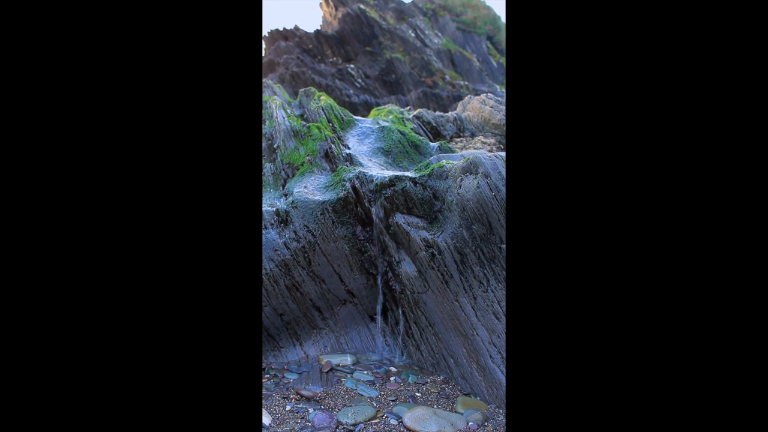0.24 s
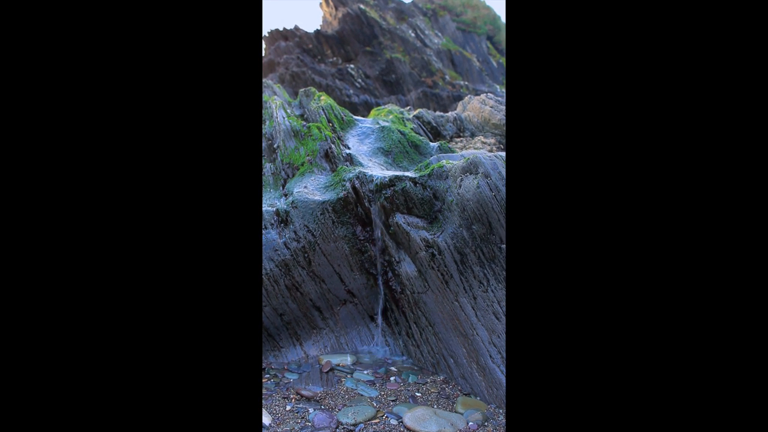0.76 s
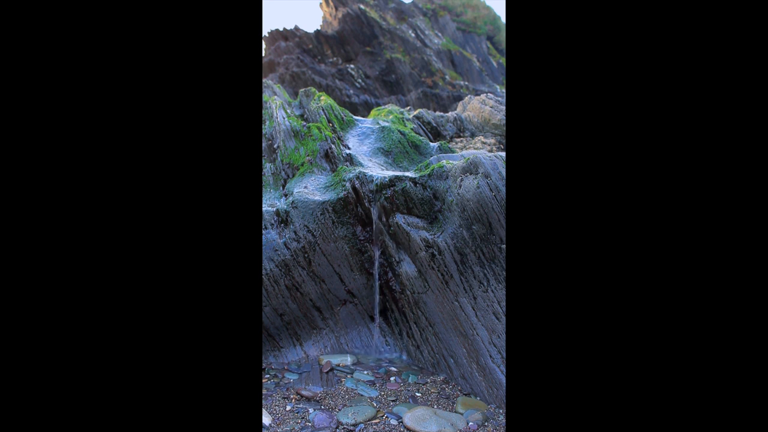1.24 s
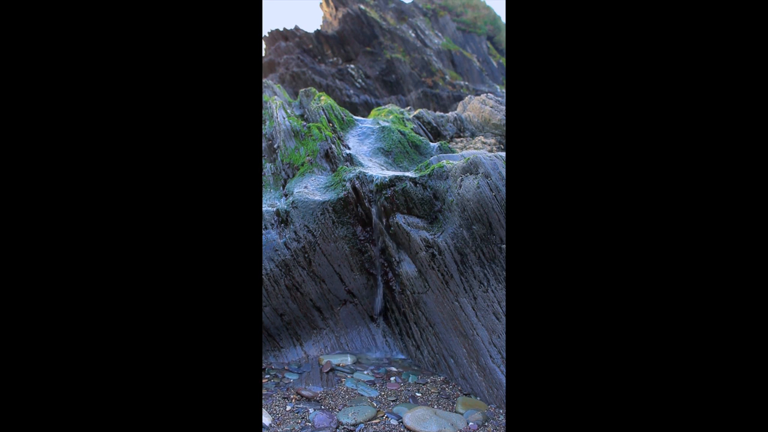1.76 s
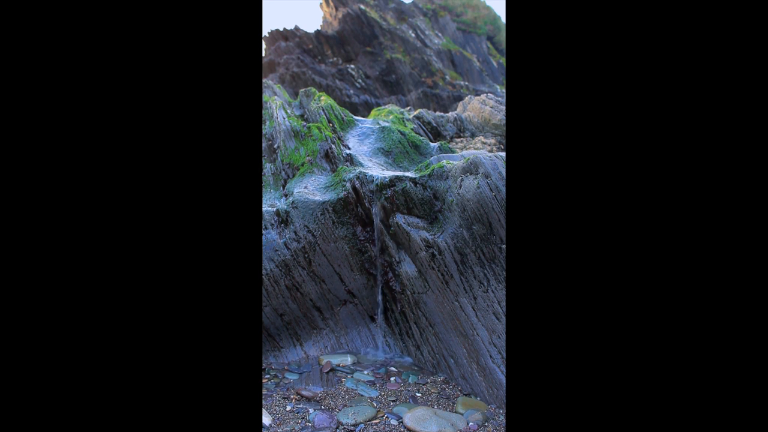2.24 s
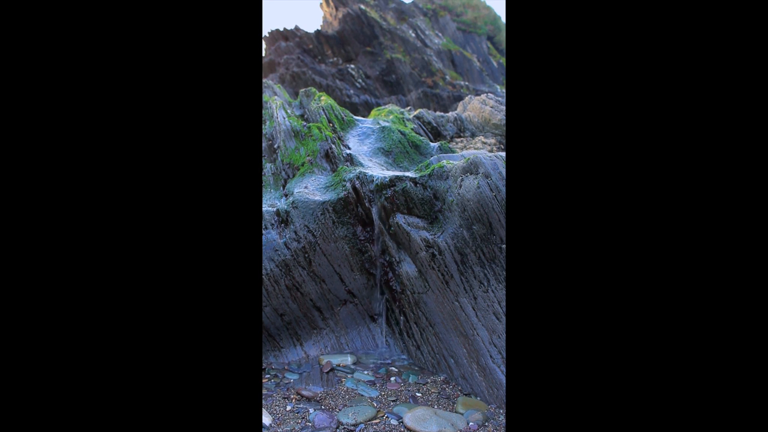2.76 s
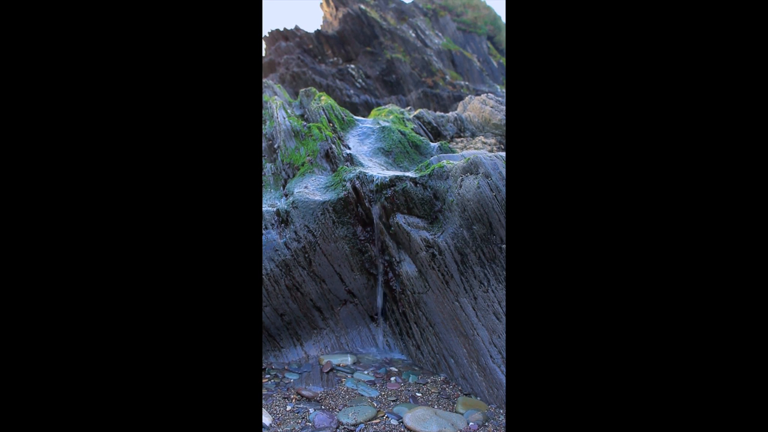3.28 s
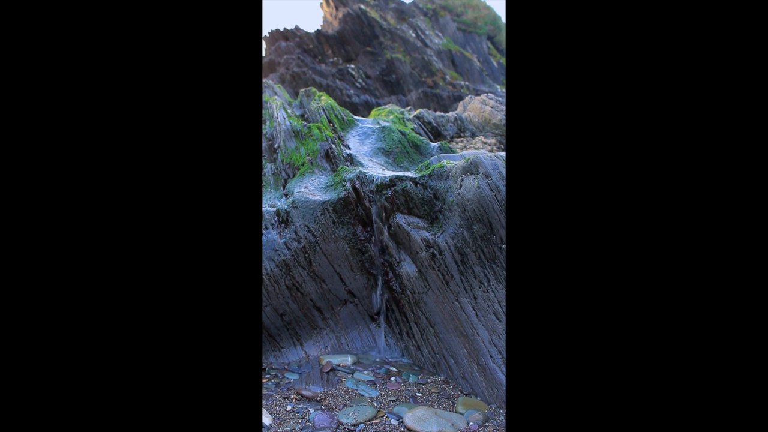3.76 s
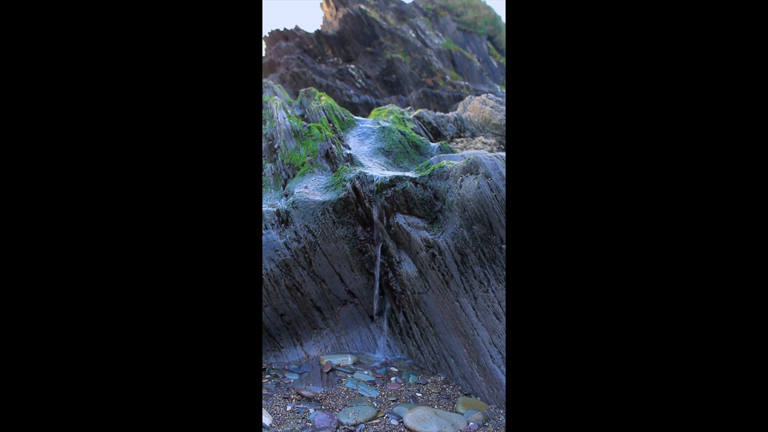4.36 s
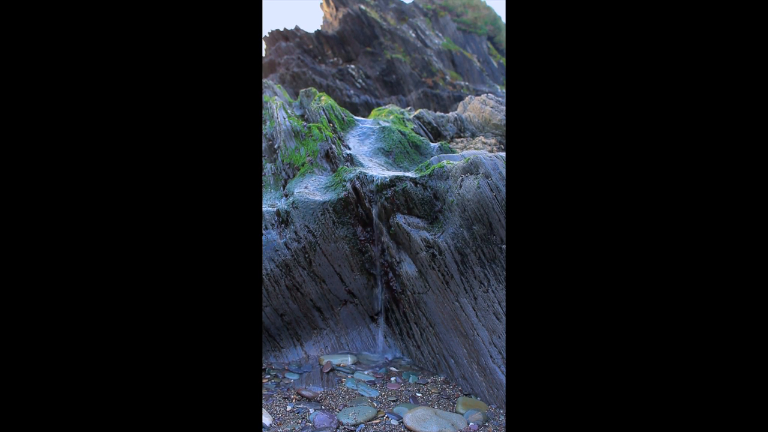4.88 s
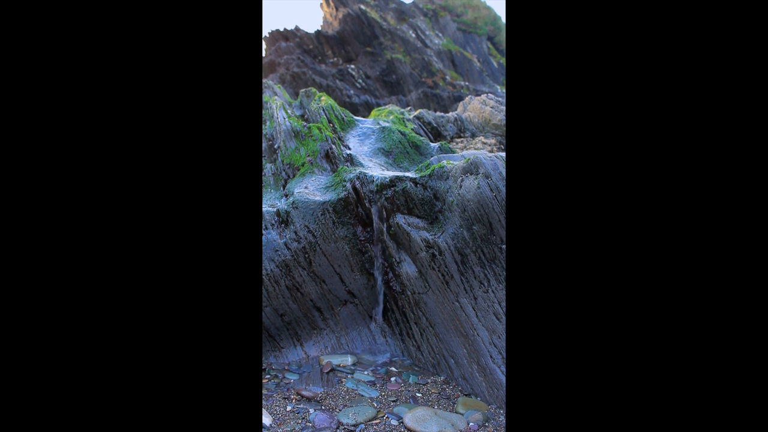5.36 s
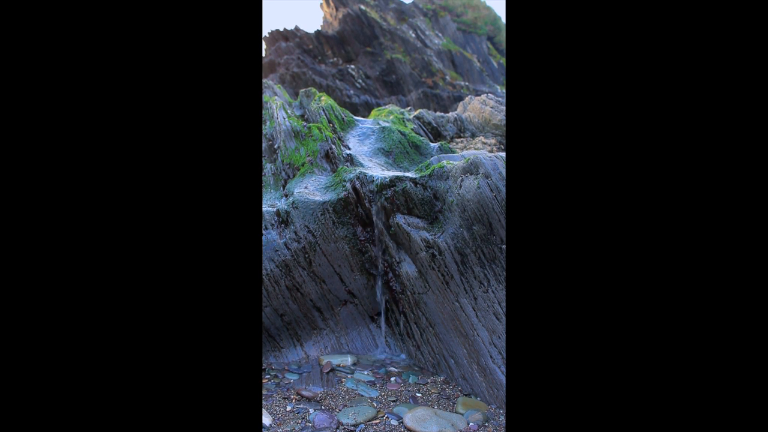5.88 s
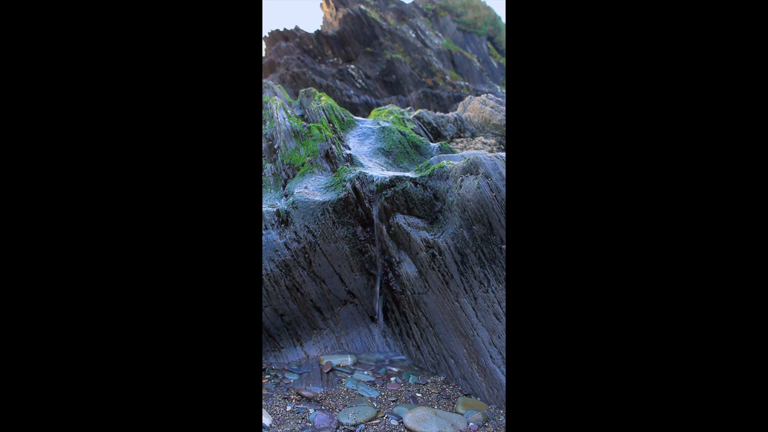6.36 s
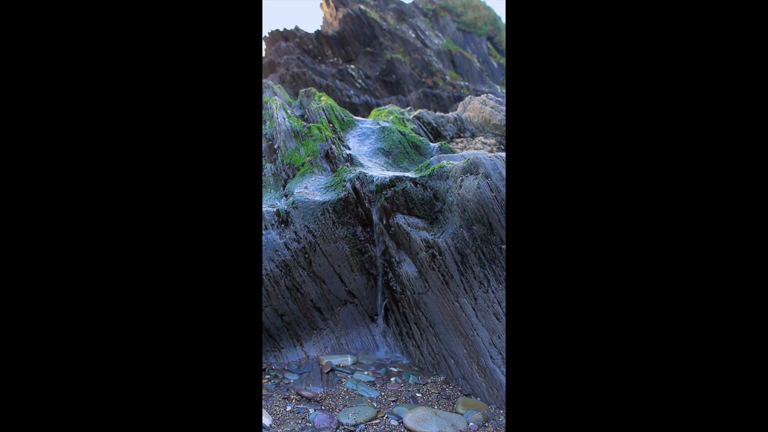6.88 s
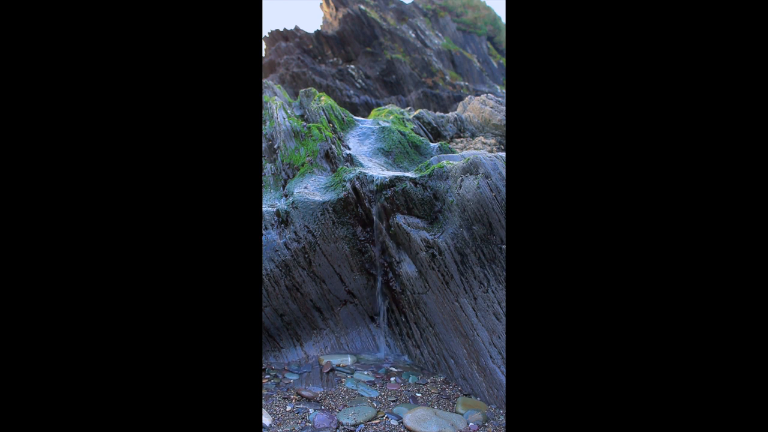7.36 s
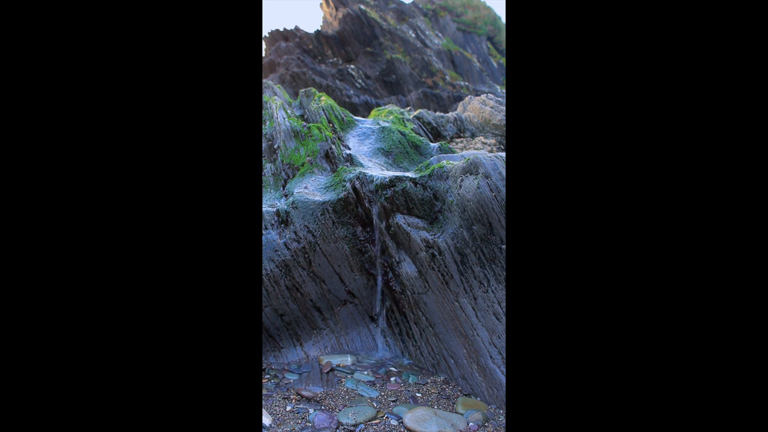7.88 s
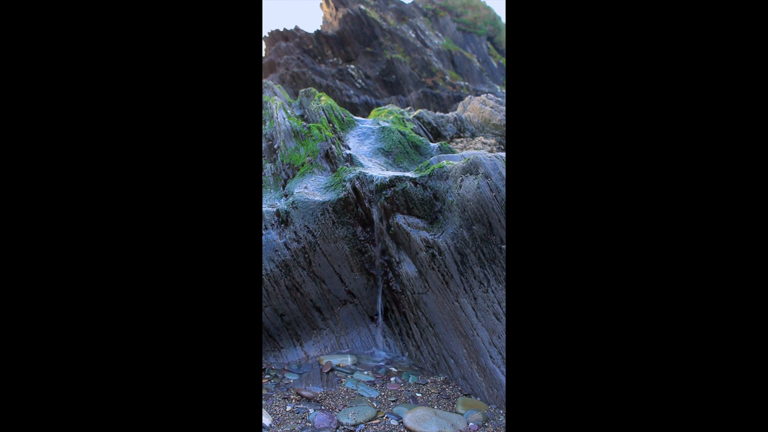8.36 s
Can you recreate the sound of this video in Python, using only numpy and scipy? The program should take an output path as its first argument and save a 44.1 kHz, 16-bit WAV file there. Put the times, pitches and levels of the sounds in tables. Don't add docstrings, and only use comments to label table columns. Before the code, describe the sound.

Close, crisp water drops plink and spit among beach stones with soft far waves behind; late on, pebbles grind and knock briefly.

```python
import sys
import numpy as np
from scipy import signal
from scipy.io import wavfile
from scipy.ndimage import uniform_filter1d, map_coordinates

SR = 44100
rng = np.random.default_rng(int(sys.argv[2]) if len(sys.argv) > 2 else 0)


def generate_wav(signal):
    frames = np.transpose(np.atleast_2d(signal))
    scaled = np.clip(frames, -1, 1) * 32767
    pcm = np.round(scaled).astype(np.int16)
    wavfile.write(sys.argv[1], SR, pcm)


def nominal_scale(level):
    x = np.asarray(level, float) / 20
    return 10 ** x


N = 380583


def evened(x):
    return x / np.sqrt(np.mean(x ** 2) + 1e-20)


def smooth_noise(shape, *sizes):
    drift = rng.standard_normal(shape)
    for axis, size in enumerate(sizes):
        drift = uniform_filter1d(drift, size=size, axis=axis)
    return evened(drift)


def read(points, hz):
    point_hz, value = np.transpose(points)
    return np.interp(np.log(hz + 1), np.log(point_hz + 1), value)


def follow(rows, column):
    columns = np.transpose(rows)
    return np.interp(np.arange(N) / SR, columns[0], columns[column])


def band_rms(x, lo_hz, hi_hz):
    band = signal.butter(4, [lo_hz, hi_hz], "band", fs=SR, output="sos")
    return np.std(signal.sosfilt(band, x))


def add(mix, s, sound):
    part = mix[max(round(s * SR), 0):][:len(sound)]
    part += sound[:len(part)]


def pip(hz, ms, glide):
    u = np.arange(round(ms * SR / 1000)) / (ms * SR / 1000)
    shape = 6.75 * u * (1 - u) ** 2
    cycles = hz * ms / 1000 * (u * (1 - glide / 3) + glide * u ** 2 / 2)
    return shape * np.sin(2 * np.pi * cycles)


def bubbles(rows, ms, glide, early):
    out = np.zeros(N)
    for (s, db, hz), (long, bend) in zip(rows, rng.random((len(rows), 2))):
        length_ms = ms * (0.55 + 0.6 * long)
        add(out, s - early * length_ms / 3000, nominal_scale(db) * pip(hz, length_ms, glide * 2 * bend))
    return out


def scatter(chords_hz, sizes_db, per_s, spread_db, ms, size=N):
    strength = nominal_scale(spread_db * np.minimum(rng.exponential(1, size), 3))
    hits = (rng.random(size) < per_s / SR) * strength
    which = rng.integers(0, len(chords_hz), size)
    out = np.zeros(size)
    for k, chord in enumerate(zip(chords_hz, sizes_db)):
        grain = np.zeros(1500)
        for hz, db in zip(*chord):
            late, long, bend = rng.random(3)
            tone = evened(pip(hz, ms * (0.5 + long), 0.056 * bend))
            add(grain, late * ms / 3000, nominal_scale(db) * tone)
        out += signal.oaconvolve(hits * (which == k), np.trim_zeros(grain, "b"))[:size]
    return evened(out)


def surf():
    # (pitch [Hz], level [dB per Hz])
    surf_colour = [(64, -56), (110, -19), (170, 3), (330, 4), (520, 2), (1000, -4), (2000, -10.5),
                   (6000, -28.5), (10300, -37), (15000, -74)]
    # (time [s], level [dB])
    swell = [(0.0, -30.5), (0.3, -28.5), (0.9, -29.5), (1.22, -25), (1.36, -27.5), (1.46, -33.5),
             (1.66, -25.5), (2.12, -30), (2.52, -28.5), (3.03, -32.5), (3.3, -27), (3.98, -31.5),
             (4.6, -30), (5.9, -32.5), (6.34, -34.5), (6.58, -32.5), (7.88, -37.5), (8.63, -34.5)]
    frames, hz = N // 256 + 5, np.fft.rfftfreq(1024, 1 / SR)
    a, b = rng.standard_normal((2, 513, frames))
    patches_db = 1.1 * smooth_noise((513, frames), 10, 10)
    spectra = (a + 1j * b) * nominal_scale(read(surf_colour, hz)[:, None] + patches_db)
    wash = signal.istft(spectra, nperseg=1024, noverlap=768)[1][:N]
    return wash / band_rms(wash, 100, 920) * nominal_scale(follow(swell, 1) + 2.5)


def spray(fallen):
    # (pitch [Hz], level [dB])
    spray_colour = [(2300, -4.5), (3300, 0), (4300, 4.5), (5400, 1.5), (7000, 4), (8300, 3), (10000, 5),
                    (15800, -9)]
    # (time [s], spray level [dB])
    trickle = [(0.0, -38), (0.86, -37.5), (1.36, -32), (1.46, -42.5), (1.74, -33), (2.52, -32), (2.92, -39),
               (3.6, -33), (4.34, -43), (4.5, -33), (5.16, -31.5), (5.42, -36.5), (5.9, -34.5),
               (6.34, -37.5), (7.46, -26), (7.88, -39.5), (8.12, -31), (8.63, -36)]
    # (time [s], level [dB], length [ms])
    splashes = [(0.264, -33, 50), (0.456, -31.5, 10), (0.662, -43, 10), (1.534, -29.5, 28),
                (1.571, -34, 24), (1.684, -33.5, 48), (1.829, -27, 8.7), (1.964, -29, 7.5),
                (2.026, -21, 7.5), (2.334, -27, 6.8), (2.472, -32, 25), (2.732, -25.5, 12.6),
                (2.763, -28, 18), (2.86, -36.5, 83), (3.921, -29.5, 18), (3.962, -35, 42),
                (4.244, -33.5, 32), (4.649, -34, 35), (5.187, -31, 27), (5.399, -26.5, 5.5),
                (5.54, -32, 26), (5.591, -34, 38), (5.639, -26, 8.2), (5.949, -30, 11), (6.192, -32, 58),
                (6.841, -30, 31), (6.995, -32, 7.4), (7.148, -35, 46), (7.341, -26.5, 7.5),
                (8.472, -28, 7.6)]
    # (time [s], level [dB])
    slaps = [(0.081, -27), (0.6, -32), (0.793, -25), (2.109, -25), (3.585, -24.5), (4.174, -34),
             (4.481, -35), (4.515, -30), (4.708, -33.5), (5.047, -25), (5.67, -34), (6.531, -28.5),
             (6.592, -19.5), (6.674, -25), (6.883, -27), (6.899, -26), (6.927, -27), (7.014, -31),
             (7.218, -28), (7.305, -22), (7.458, -38), (8.008, -39)]
    # (time [s], level [dB])
    spatters = [(0.394, -34), (0.489, -35.5), (1.384, -38.5), (1.627, -49), (1.681, -41), (1.766, -37),
                (1.907, -35), (1.964, -34), (2.219, -33), (2.286, -33), (2.352, -38), (2.428, -49),
                (2.899, -45), (2.933, -42), (3.148, -34.5), (3.325, -41), (3.429, -36), (3.688, -41),
                (3.723, -32.5), (4.03, -34), (4.132, -35), (4.169, -41), (4.218, -36), (4.485, -32.5),
                (4.976, -36), (5.104, -30.5), (5.149, -38), (5.268, -34), (5.346, -38), (5.794, -35.5),
                (5.86, -31.5), (6.32, -39), (6.489, -36), (7.62, -49), (8.009, -35), (8.198, -31.5),
                (8.244, -49), (8.398, -41)]
    slap_ms, spatter_ms = 7.8, 23.6

    hz = np.geomspace(2300, 15800, num=120)
    chords = rng.permuted(hz.reshape(6, -1), axis=1).T
    mist = scatter(chords, read(spray_colour, chords), per_s=300, spread_db=2.8, ms=3.3)
    thinned = chords[::2]
    hiss = scatter(thinned, read(spray_colour, thinned), per_s=5400, spread_db=-3.5, ms=1.4)
    lone = hz[18:96:2, None]
    plinks = scatter(lone, read(spray_colour, lone), per_s=600, spread_db=5.5, ms=3.6)

    thrown = np.zeros(N)
    impacts = splashes + [(*row, slap_ms) for row in slaps] + [(*row, spatter_ms) for row in spatters]
    for s, db, ms in impacts:
        u = np.linspace(0, 1, round(ms * SR / 1000))
        sudden_start = np.minimum(u * ms / 1.7, 1)
        soft_end = np.sqrt(1 - u ** 3)
        add(thrown, s, nominal_scale(db) * sudden_start * soft_end)
    for s, db, _ in fallen:
        add(thrown, s, nominal_scale(db - 18.0 - np.arange(900) * 0.21))

    bunches_db = 5.7 * smooth_noise(N, 500)
    bed = (0.65 * mist + 0.83 * plinks + 0.64 * hiss) * nominal_scale(follow(trickle, 1) - 4.5 + bunches_db)
    bed = signal.sosfilt(signal.butter(2, 9500, fs=SR, output="sos"), bed)
    wet = bed + (0.8 * hiss + 1.28 * mist + 0.21 * plinks) * thrown
    z = signal.stft(wet, nperseg=256)[2]
    patches_db = 2.6 * smooth_noise(z.shape, 6, 7)
    wet = signal.istft(z * nominal_scale(patches_db - 0.92), nperseg=256)[1][:N]
    return wet + 0.2 * np.roll(wet, 31)


def rock_echo(x):
    # (pitch [Hz], time to fall by 60 dB [s])
    ring_times = [(1000, .07), (12000, .03)]
    taps = np.zeros(8000)
    places = np.arange(90, 7900, 40) + rng.integers(0, 40, 196)
    taps[places] = rng.choice([-1., 1.], 196)
    hz, t, z = signal.stft(taps, SR, nperseg=128)
    fall_db = -60 * t / np.maximum(read(ring_times, hz), 0.01)[:, None]
    tail = signal.istft(z * nominal_scale(fall_db), SR, nperseg=128)[1]
    return signal.oaconvolve(x, tail / np.linalg.norm(tail))[:N]


def beads():
    # (time of the peak [s], peak [dB], bubble pitch [Hz])
    bead_rows = [(0.2779, -14.5, 4200), (0.3022, -15, 4260), (1.1984, -16.2, 5100), (1.6406, -14, 4540),
                 (1.7723, -18, 3900), (1.7763, -16, 4100), (1.7963, -15, 2860), (1.7963, -15, 4500),
                 (1.982, -13, 4540), (2.0437, -17.7, 5200), (2.1039, -17.5, 4250), (2.2922, -14.4, 3300),
                 (2.3336, -14, 4480), (2.3405, -13, 5430), (2.4435, -22, 4400), (2.4559, -18, 4530),
                 (2.4918, -13.5, 4200), (2.9493, -12, 5680), (2.9867, -19, 4390), (3.385, -14.5, 4070),
                 (3.4986, -15, 3940), (3.7428, -19, 4220), (3.8026, -12.5, 4170), (3.8843, -5.5, 3400),
                 (3.9351, -20, 5080), (3.9721, -12, 4960), (4.2532, -15, 3200), (4.7253, -15.5, 4360),
                 (4.882, -16, 4840), (4.9063, -19, 4100), (5.1907, -16, 3700), (5.649, -18, 3500),
                 (5.6737, -16, 4330), (5.6842, -17, 3530), (5.7212, -18.2, 4220), (5.776, -16, 5040),
                 (5.9537, -15, 3950), (6.0129, -18, 4160), (6.2313, -16.7, 4730), (6.3278, -18, 5600),
                 (6.3278, -16, 4650), (6.5005, -18, 4630), (6.6866, -15.5, 3500), (6.9997, -11, 3620),
                 (7.2559, -15, 5250), (7.2798, -15, 4480), (7.442, -16, 4400), (7.5501, -12, 3700),
                 (8.4767, -15, 5300), (8.5141, -16.5, 4000),
                 (0.0062, -17.5, 5650), (0.3766, -18, 8000), (0.6015, -19, 6720), (1.096, -17, 5830),
                    (1.5372, -20, 6600), (1.7857, -16, 5940), (1.8355, -18, 6250), (1.9207, -18, 5730),
                    (1.9813, -20, 7580), (2.0307, -20, 7600), (2.293, -18.5, 6700), (2.4958, -15, 5560),
                    (2.548, -17, 7600), (2.773, -15, 8360), (2.8644, -12.5, 5970), (2.9105, -20, 8700),
                    (3.0092, -16, 6700), (3.569, -17, 6890), (3.7413, -15, 6030), (4.1876, -16, 8000),
                    (4.5199, -27, 8440), (4.7282, -15.3, 7000), (4.8226, -18, 7000), (5.0286, -17, 7060),
                    (5.0297, -19, 8800), (5.0489, -17.4, 6570), (5.0518, -18, 8150), (5.1962, -16, 7850),
                    (5.4026, -18, 6300), (5.4052, -19.4, 8610), (5.6845, -16, 5600), (5.953, -13, 6950),
                    (6.1402, -18.1, 7900), (6.5154, -16, 6630), (6.5361, -16.6, 7490),
                    (6.6794, -19.0, 6700), (6.6873, -15, 5800), (6.8506, -20, 7150), (6.8905, -15, 5940),
                    (6.9029, -14, 5680), (6.9301, -22, 6890), (7.0005, -19.4, 8200), (7.1786, -18.6, 8440),
                    (7.2207, -18, 6600), (7.253, -16.3, 5940), (7.4113, -11, 6600), (8.0761, -18, 6630),
                    (8.1625, -18.5, 7170), (8.476, -18, 7800),
                 (0.5957, -20.6, 10100), (0.7975, -19, 10900), (1.5372, -20, 11460), (1.8362, -20, 10500),
                   (2.3917, -13, 9600), (2.5034, -17, 10700), (2.7733, -20, 11800), (3.5117, -20, 9990),
                   (3.5545, -21, 10340), (3.8022, -18, 10400), (4.1879, -17, 10700), (4.2522, -18.1, 9650),
                   (4.8186, -17.5, 9200), (5.1062, -20.9, 10100), (5.7698, -17.5, 10500),
                   (6.123, -17, 11630), (6.5553, -16.0, 8900), (6.806, -18, 10770), (6.8455, -23, 10100),
                   (6.93, -22, 9200), (8.0254, -17, 10680), (8.1556, -18, 11220), (8.5225, -17.0, 9180),
                 (0.752, -19, 4570), (1.325, -19, 9390), (1.348, -18, 9400), (2.138, -16, 3860),
                     (2.313, -16, 2960), (2.3401, -16, 4740), (2.3909, -14, 4470), (5.1222, -14, 4310),
                     (5.1991, -18, 4220), (5.596, -18, 4220), (5.9, -20, 4260), (6.0836, -18, 3700),
                     (6.1243, -19, 3960), (6.7621, -18, 4390), (6.819, -20, 2840), (7.442, -13, 3400),
                     (8.164, -17, 4390)]
    rows = bead_rows
    return bubbles(rows, ms=3.4, glide=0.09, early=1)


def drops(small, large):
    fine = bubbles(small, ms=2.9, glide=0.07, early=1)
    return fine + bubbles(large, ms=3.5, glide=0.1, early=1)


def plops():
    # (time of the start [s], peak [dB], bubble pitch [Hz])
    plop_rows = [(0.155, -20.5, 2500), (0.49, -21, 2050), (0.678, -22, 2860), (3.298, -22, 2100),
                 (3.3278, -18.5, 2050), (3.3852, -18, 2100), (3.533, -17.5, 2000), (3.6127, -19, 2270),
                 (3.622, -18, 2450), (3.7, -22, 1900), (6.9007, -15.5, 1440), (7.9778, -17.5, 1970),
                 (8.054, -18, 2150)]
    return bubbles(plop_rows, ms=7, glide=0.12, early=0)


def gravel():
    # (time [s], level [dB], share of larger stones [dB], gap pitch [ratio])
    crunch = [
        (6.9, -46, -14, 0.9),
        (7.05, -23, 3.5, .9),
        (7.12, -26, -2.5, 0.94),
        (7.22, -15, -3, 1.076),
        (7.69, -17.5, -13, .86),
        (7.79, -16, -3, 0.97),
        (7.83, -30.5, -14, 0.88),
        (8.09, -25, -6, 0.96),
        (8.45, -37, -7, 0.94),
    ]
    # (pitch [Hz], width [Hz], level [dB])
    gaps = [(1550, 340, 0.5), (2140, 320, -2), (2745, 600, 0), (4900, 2340, -9)]
    start, end = round(crunch[0][0] * SR), round(crunch[-1][0] * SR)
    size = end - start
    hz, width, db = np.repeat(gaps, 30, axis=0).T[:, :, None]
    hz = hz + width * rng.uniform(-0.8, 0.8, hz.shape)
    small = scatter(hz, db, per_s=4500, spread_db=3.0, ms=3.2, size=size)
    low_hz = np.linspace(400, 1150, num=60)[:, None]
    low_db = -abs(low_hz - 820) / 110
    large = scatter(low_hz, low_db, per_s=1000, spread_db=2.0, ms=5.2, size=size)

    slide = np.cumsum(np.clip(follow(crunch, 3)[start:end], 0.7, 1.3))
    small = map_coordinates(small, [slide], order=3, mode="mirror")
    large = map_coordinates(large, [slide], order=3, mode="mirror")
    grind = small + large * nominal_scale(follow(crunch, 2)[start:end])
    grind = grind * nominal_scale(1.14 * smooth_noise(size, 900))
    return np.pad(grind * nominal_scale(follow(crunch, 1)[start:end] - 5.0), (start, N - end))


def knocks():
    # (time of the peak [s], peak [dB], ring pitch [Hz])
    knock_rows = [(7.2323, -11, 2500), (7.2432, -7.5, 1620), (7.2504, -12, 770), (7.3027, -14, 1470),
                  (7.3157, -19, 1460), (7.3266, -8, 1440), (7.3273, -12, 2600), (7.3469, -10.0, 2470),
                  (7.5508, -10.0, 1550), (7.7431, -11, 2670), (7.7794, -13.5, 2440), (7.7925, -10.5, 780)]
    return bubbles(knock_rows, ms=6.66, glide=0.05, early=0.97)


def scene():
    # (time of the peak [s], peak [dB], bubble pitch [Hz])
    small_drops = [(0.3307, -12.5, 5550), (0.6, -16, 5540), (0.797, -12.5, 6450), (1.3387, -15, 5570),
                   (1.506, -11.5, 6540), (1.5751, -18, 6230), (1.7732, -21, 5900), (1.9811, -11, 5700),
                   (2.028, -10, 6000), (2.3907, -16, 5660), (2.7376, -14, 6430), (3.0078, -13.5, 5770),
                   (3.093, -13, 6200), (3.25, -15, 5830), (3.2868, -8, 5800), (3.386, -15, 5640),
                   (3.5154, -12.5, 5400), (3.816, -10, 6000), (4.2717, -13, 6000), (4.7347, -12.5, 6340),
                   (5.767, -15, 5700), (5.9528, -10, 5430), (6.233, -12, 5900), (6.5006, -14.5, 6400),
                   (6.5986, -11, 5800), (6.6883, -13, 6550), (6.7868, -12.5, 6040), (6.8856, -10, 5400),
                   (7.461, -11, 6160),
                   (0.1, -14.2, 6940), (0.2587, -17, 7240), (0.4085, -10, 6880), (1.259, -12, 6900),
                (1.7968, -13, 6800), (1.978, -18, 7600), (2.4584, -14, 7040), (2.742, -8.5, 6900),
                (2.864, -14, 7560), (3.3493, -11, 6880), (3.384, -13, 7060), (3.5003, -14, 6850),
                (3.553, -6, 7150), (4.1873, -10, 6670), (4.2672, -14, 6760), (4.402, -11.5, 7550),
                (4.7106, -11.5, 6850), (5.0518, -16, 6830), (5.196, -12.5, 6800), (5.302, -12.5, 6760),
                (5.5956, -10.5, 7100), (5.798, -9.5, 7000), (5.998, -14.5, 7100), (6.554, -12, 7360),
                (6.591, -15, 7300), (6.862, -12, 7400), (7.7513, -9, 7660), (8.021, -10.5, 6910),
                (8.0856, -12, 6700), (8.3432, -18, 7060),
                   (0.033, -14, 10440), (0.6026, -17, 9100), (0.6667, -17, 10100), (0.752, -15, 10150),
              (1.244, -14.5, 11200), (1.575, -15, 8860), (2.114, -16, 9370), (2.3343, -13.5, 9200),
              (2.391, -17, 9500), (2.504, -8.5, 9200), (2.986, -17, 8240), (4.222, -18, 9050),
              (4.2222, -17, 11020), (4.2477, -12, 8300), (5.674, -11, 8730), (6.597, -13, 11150),
              (6.598, -13, 9150), (6.8457, -16, 11100), (6.9304, -17, 8540), (7.1614, -16, 8700),
              (7.2256, -16.8, 10420), (7.3094, -21, 9990), (7.6226, -12, 8800), (7.789, -6.5, 9330),
              (8.0096, -14, 9460), (8.025, -12, 8440), (8.292, -13.5, 9200), (8.572, -14, 8700)]
    large_drops = [(0.333, -13, 3600), (0.4611, -8.5, 3320), (0.902, -13.5, 3450), (1.473, -10, 3520),
                   (1.6024, -10, 3450), (1.7737, -11, 3000), (2.0137, -11, 3320), (2.334, -13, 3530),
                   (2.7697, -9.5, 3500), (2.7947, -12, 3600), (3.0943, -11, 3660), (3.1447, -4, 3230),
                   (3.604, -10.5, 3670), (3.803, -8.5, 3310), (3.88, -10, 3430), (4.1121, -12.5, 3380),
                   (4.148, -15, 3110), (4.726, -10.5, 3360), (4.821, -8.5, 3620), (5.053, -10, 3470),
                   (5.3034, -14, 2950), (5.674, -8, 3320), (6.3269, -10.5, 3640), (6.9055, -11, 3250),
                   (6.9439, -14.5, 3400), (7.018, -16, 3500), (7.1822, -6.5, 3600), (7.2255, -10, 3480),
                   (8.606, -5.5, 3730),
                   (0.309, -13, 3900), (0.33, -9.5, 4220), (0.417, -7, 4130), (1.2, -14.5, 4200),
                   (1.638, -14.5, 3850), (2.028, -11, 4200), (2.29, -9.5, 4200), (2.3403, -11, 3920),
                   (2.3628, -9, 3930), (2.556, -8.5, 3950), (3.4418, -10.5, 3760), (3.742, -12, 4200),
                   (3.926, -9, 4280), (3.9557, -15, 4200), (3.97, -7, 3880), (3.977, -6.5, 3860),
                   (4.2466, -10.6, 4200), (4.2495, -10, 4070), (4.334, -8, 3960), (4.669, -6.5, 4020),
                   (4.736, -12.5, 4100), (4.888, -10, 3900), (5.551, -11, 4170), (5.6452, -12, 3950),
                   (6.139, -8, 3700), (6.2266, -12.5, 3960), (7.9818, -12.5, 3840), (8.477, -9, 4080),
                   (8.613, -8.5, 4050),
                   (0.082, -17.5, 5150), (0.463, -9.5, 4670), (0.6668, -10, 4420), (1.5053, -12.5, 4200),
                   (1.836, -12, 4330), (1.9737, -17, 5140), (2.1126, -8, 4700), (2.7385, -11, 5100),
                   (2.91, -15, 4880), (2.9486, -9.5, 4500), (2.968, -17, 4600), (3.0095, -14, 4280),
                   (3.51, -12, 4260), (4.187, -15, 5130), (4.499, -15, 4500), (4.888, -11.5, 4650),
                   (5.049, -14, 4760), (5.106, -11, 4320), (5.5426, -8.5, 4700), (5.562, -11, 5300),
                   (6.419, -15, 4400), (6.681, -7.5, 4750), (6.8232, -6, 4860), (6.8617, -14, 4340),
                   (6.891, -9, 4500), (7, -9, 4600), (7.163, -11, 4830), (7.4128, -7.5, 5200),
                   (8.0855, -9.5, 4380), (8.574, -9, 4480)]
    small = small_drops
    large = large_drops
    water = spray(small + large) + beads() + drops(small, large) + plops()
    near = water + gravel() + knocks()
    return np.tile(near + nominal_scale(-10.5) * rock_echo(near) + surf(), (2, 1))


def band_limit(x):
    return signal.sosfilt(signal.butter(12, 16350, fs=SR, output="sos"), x)


def record(dry):
    heard = signal.sosfilt(signal.butter(2, 75, "high", fs=SR, output="sos"), dry)
    heard = np.tanh(heard)
    heard = signal.sosfilt(signal.butter(8, 14400, fs=SR, output="sos"), heard)
    return band_limit(heard)


dry = scene()
out = record(dry)
generate_wav(out)
```